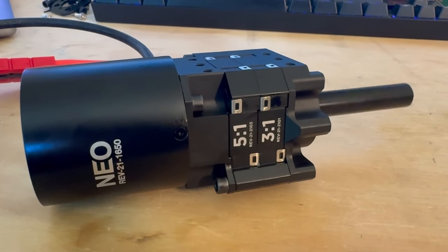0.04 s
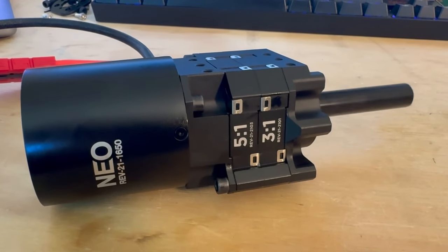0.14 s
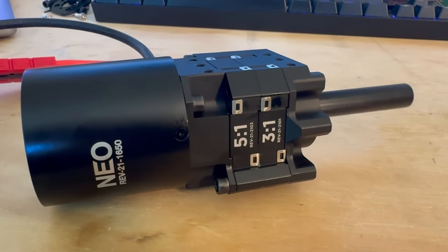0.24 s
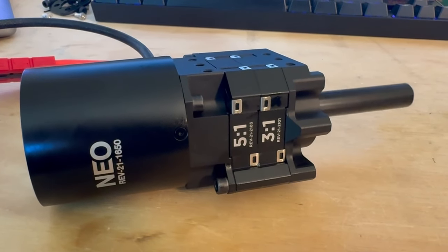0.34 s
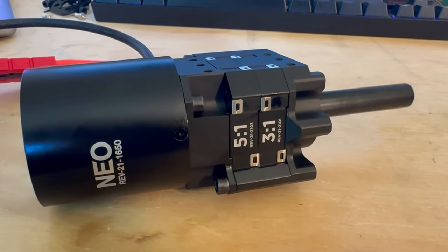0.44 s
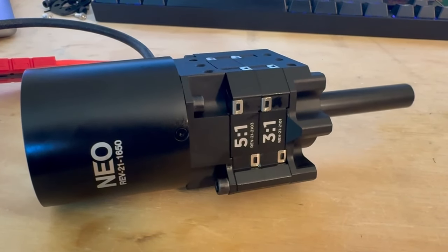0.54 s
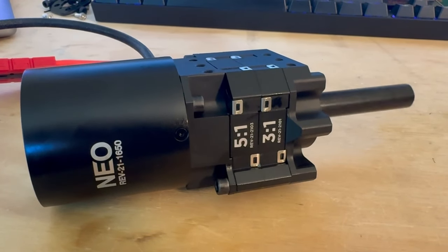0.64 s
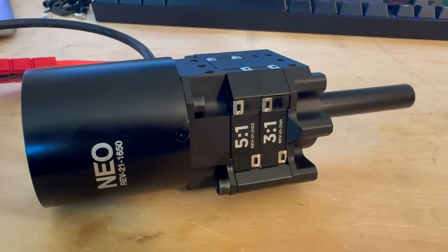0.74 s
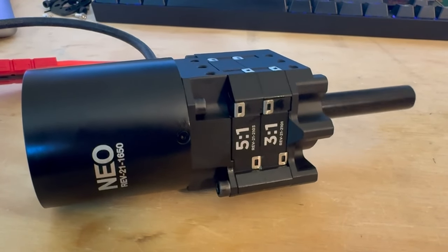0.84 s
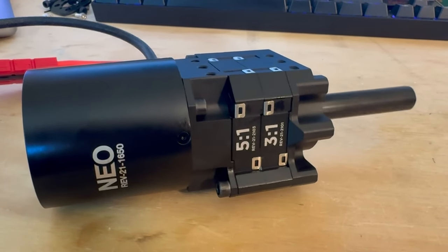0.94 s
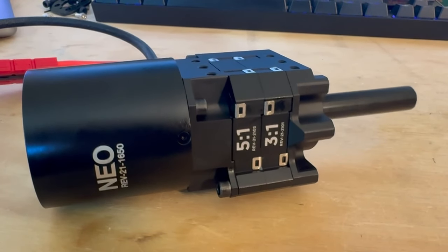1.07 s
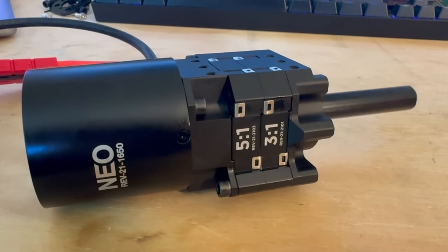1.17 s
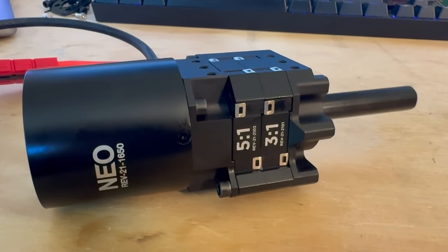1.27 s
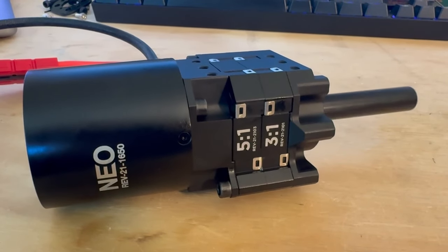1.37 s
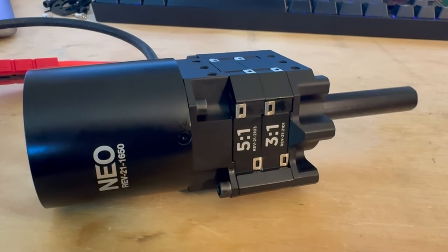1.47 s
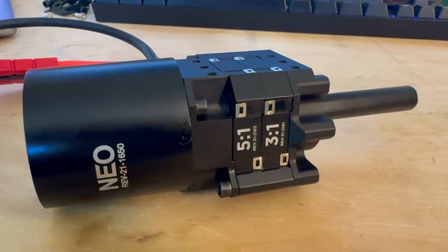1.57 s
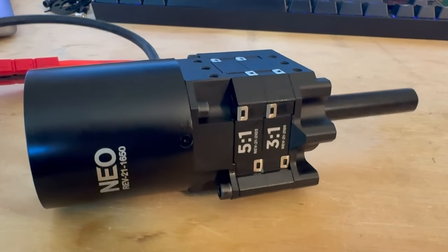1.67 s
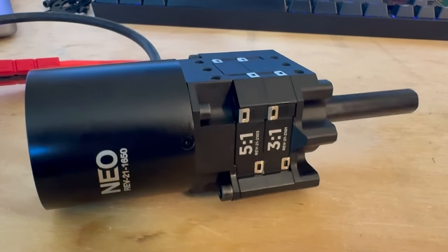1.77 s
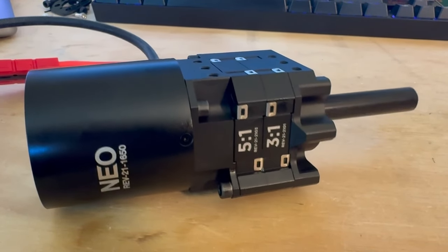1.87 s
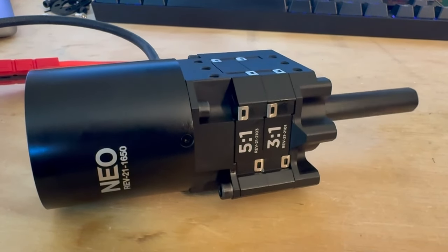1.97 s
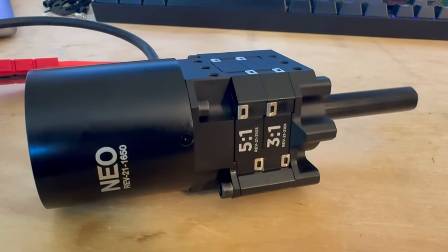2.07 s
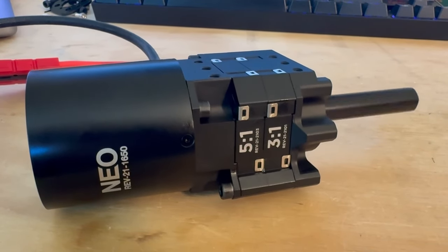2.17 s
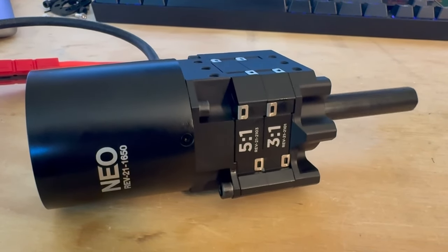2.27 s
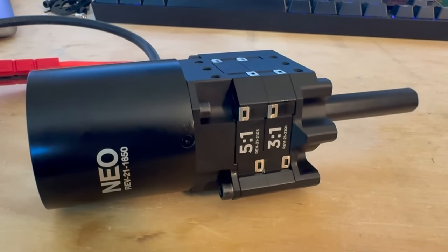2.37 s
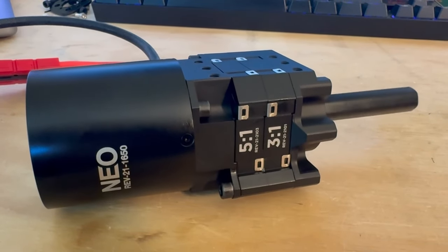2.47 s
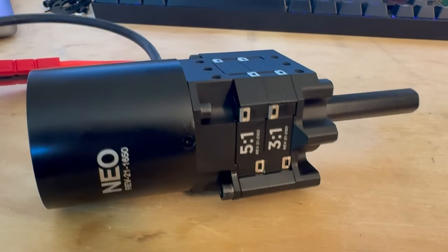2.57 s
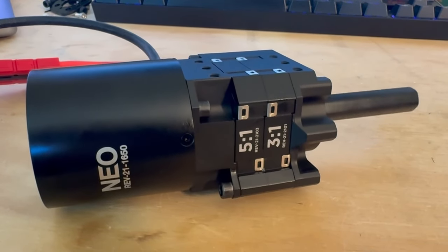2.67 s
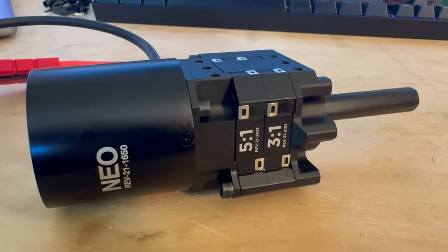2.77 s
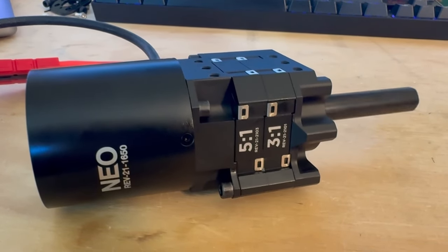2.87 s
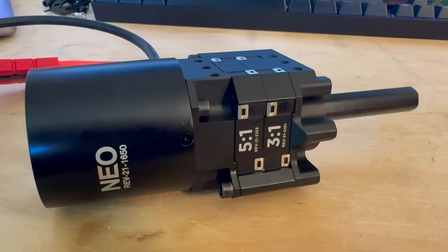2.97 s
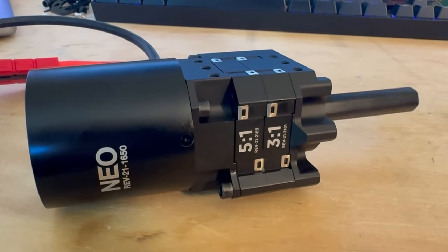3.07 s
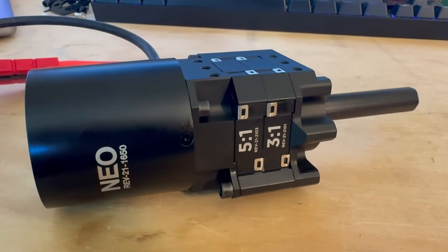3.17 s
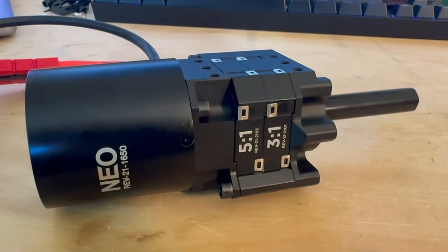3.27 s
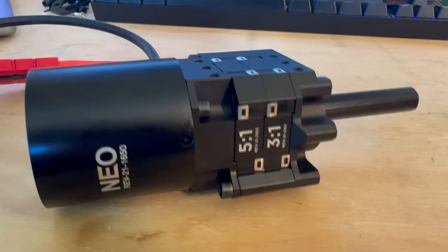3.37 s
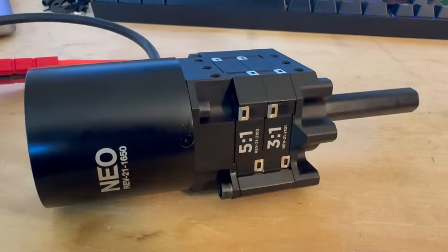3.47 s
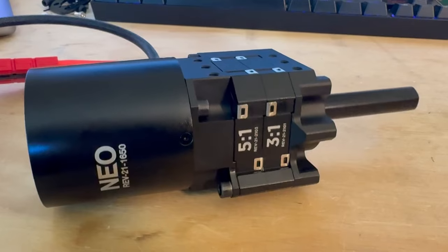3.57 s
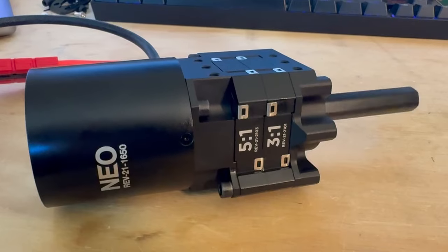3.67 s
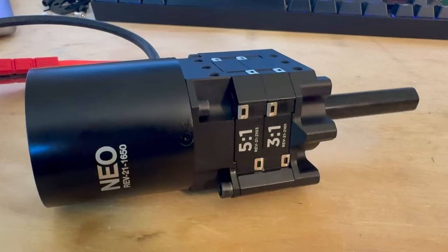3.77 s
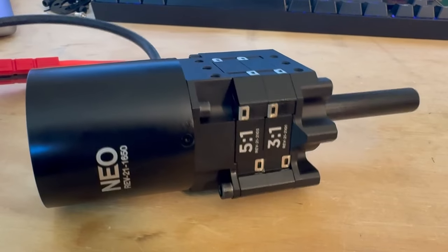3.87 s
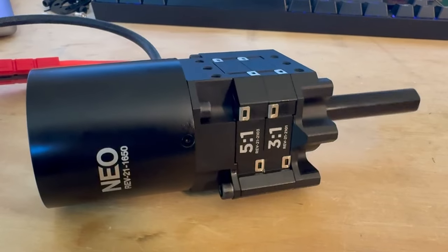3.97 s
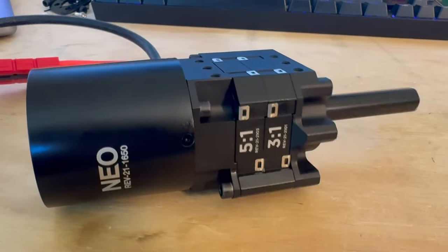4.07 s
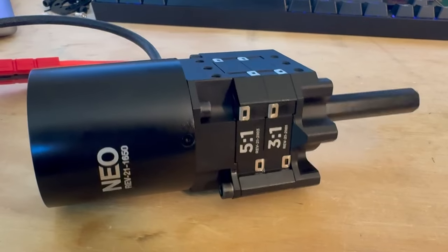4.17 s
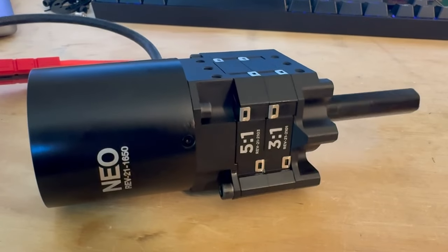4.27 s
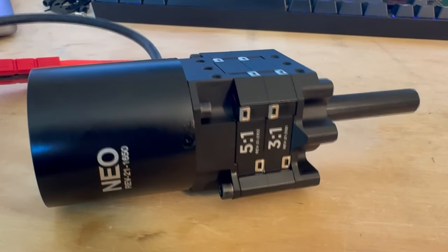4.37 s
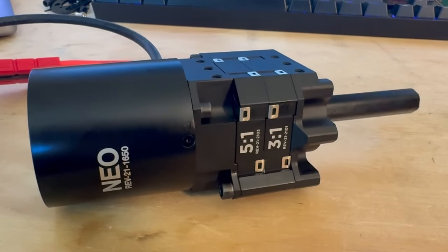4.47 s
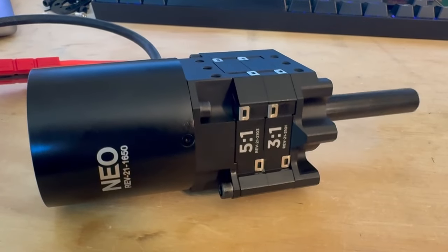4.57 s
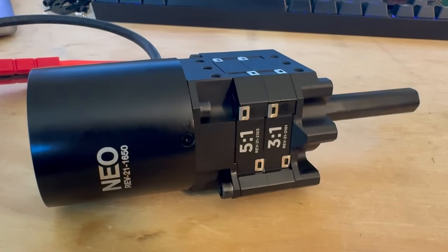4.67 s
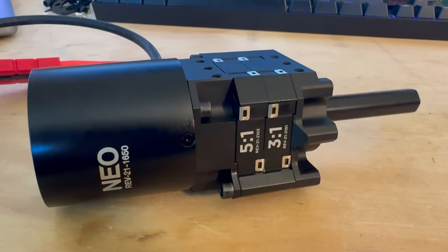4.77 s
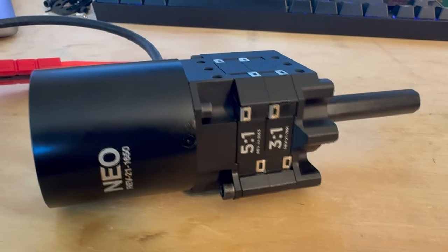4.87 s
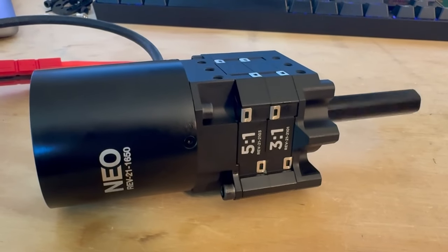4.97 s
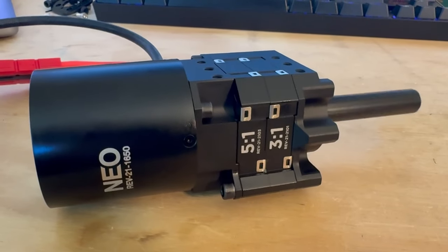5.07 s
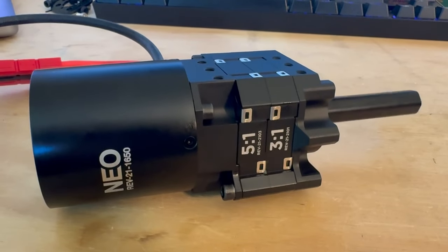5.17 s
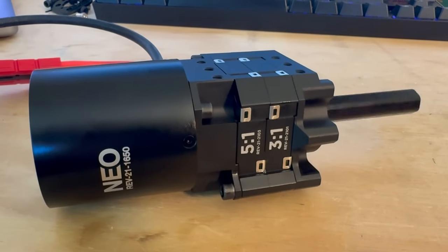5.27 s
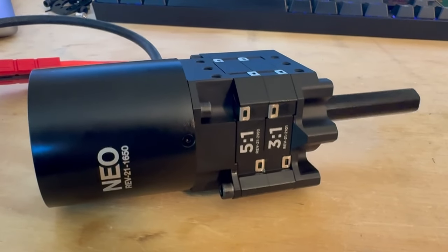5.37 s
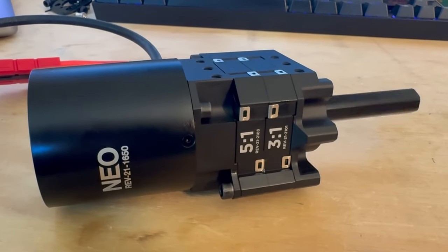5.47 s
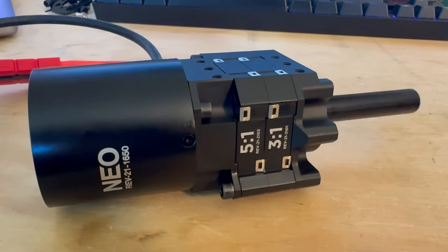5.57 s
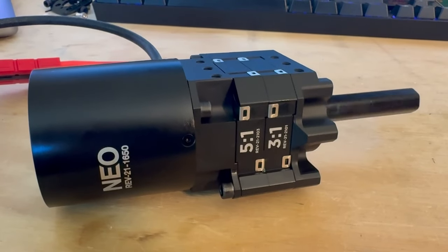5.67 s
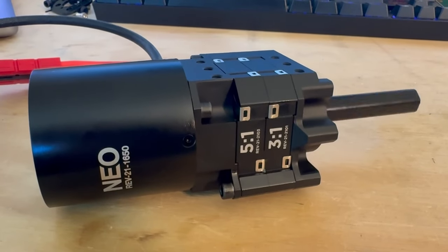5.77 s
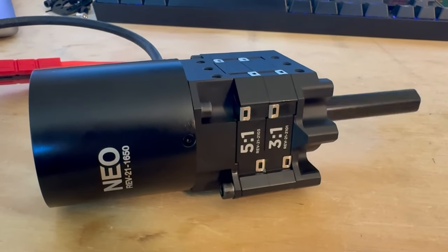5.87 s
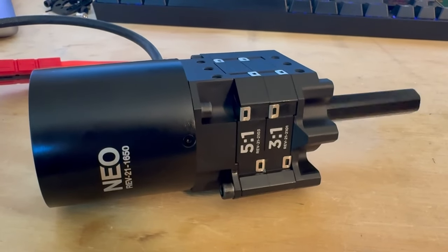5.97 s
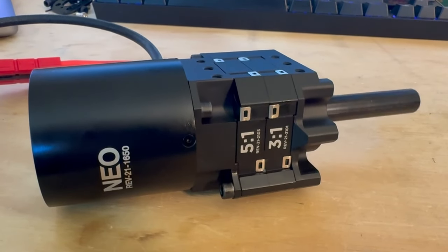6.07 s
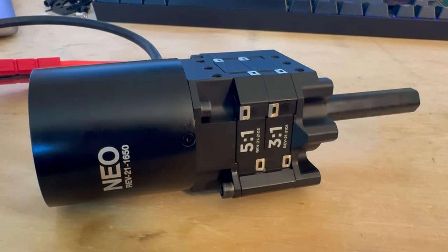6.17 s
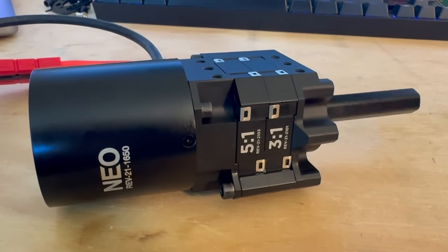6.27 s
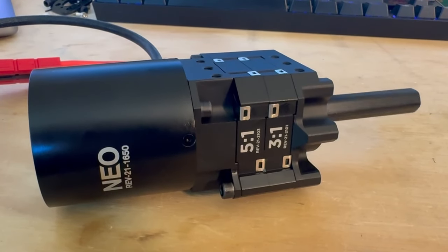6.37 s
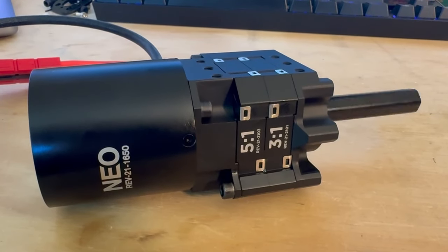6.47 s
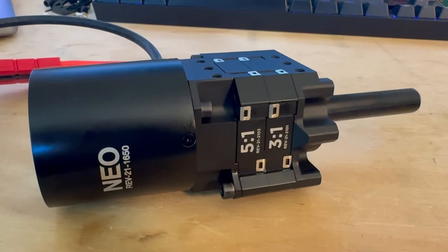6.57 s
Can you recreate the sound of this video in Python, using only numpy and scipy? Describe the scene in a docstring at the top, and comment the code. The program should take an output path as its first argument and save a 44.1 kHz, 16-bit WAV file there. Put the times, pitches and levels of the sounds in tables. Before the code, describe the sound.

Stereo close pickup of a running geared motor lying on a desk, with no other sounds. Steady high-speed whirring comes first: dense, sizzling metal chatter, a buzzing low hum and singing whines. Then everything winds down unevenly, pitch dropping in slopes and brief plateaus, with occasional sharp ticks. The rattle softens and loses its edge, leaving a low whine, a desk rumble and a growling pulse about twice a second.

```python
"""A bright rattle of loose gear teeth comes first, over the hum and whine of a small motor on a desk.
The motor turns a two-stage planetary gearbox and slows in steps, so the tones glide down and swell on
resonances of the desk and case. The rattle is noise shaped by tooth knocks, and gets quieter and duller.
The tones are sine waves locked to the rotor. Single hard snaps stand out of the rattle.
At low speed a tight spot throbs clearly, once in every turn of the output shaft."""
import sys
import numpy as np
from scipy import signal
from scipy.fft import rfft, irfft
from scipy.io import wavfile

SR = 44100
rng = np.random.default_rng(int(sys.argv[2]) if len(sys.argv) > 2 else 0)


def store_wav(level_fs):
    """Save 16-bit WAV to argv[1]."""
    pcm = np.round(np.clip(np.atleast_2d(level_fs), -1, 1) * 32767)
    wavfile.write(sys.argv[1], SR, pcm.T.astype(np.int16))


N = 291921
TIME = np.arange(N) / SR  # seconds
BINS = np.fft.rfftfreq(N, 1 / SR)  # Hz
MIDDLE_SPEED = 65  # rotor turns per second at which the source levels are given
BINDING_SPEED = 50  # rotor turns per second; above it the gears run more and more smoothly through binding
GEAR_RATIO = 15  # rotor turns per output turn, from a 5:1 and a 3:1 stage
RING_TEETH = 72  # teeth on each ring gear


# How fast the motor turns: start_s, speed_turns_per_s (straight lines in between)
ROTOR_SPEED = [(0, 110.8), (0.79, 110.6), (1, 103.7), (1.15, 100.7), (1.36, 97.8), (1.72, 87.6),
               (2.05, 84.3), (2.31, 79.8), (2.37, 77.6), (2.5, 76), (2.56, 73.6), (2.69, 71.9),
               (2.97, 71.9), (3.09, 69.8), (3.41, 67.4), (3.52, 63.1), (3.76, 63.1), (3.94, 58.9),
               (4.14, 57.4), (4.19, 53.5), (4.35, 49), (4.55, 46), (5.05, 42.9), (5.45, 36.8), (5.75, 34.9),
               (6.3, 31), (6.62, 30.9)]


def rotor_speed():
    """The rotor slows in steps; this one speed drives the tones and all the steady gear noise."""
    start_s, turns_per_s = np.transpose(ROTOR_SPEED)
    return np.interp(TIME, start_s, turns_per_s)


# How strongly the teeth sound at each pitch: pitch_hz, relative_level_db
TOOTH_RESPONSE = [(2400, -22), (3300, -14.5), (4500, -11), (5350, -9), (6800, -8.5), (7400, 1), (7650, -2),
                  (8600, -7.5), (9700, -14), (11100, -22), (12300, -19.5), (13100, -24), (14500, -14.5),
                  (15600, -26)]


def rattle(speed, top_db_per_octave=5, low_db_per_octave=-3.0):
    """Steel teeth clatter in their backlash; faster, harder contacts carry more top."""
    clatter = knocks(speed, per_turn=28, spread_db=3.0, throb_db=1.1, surge_db=0.4, ring_s=0.001, sliding=0.8)
    grazes = knocks(speed, per_turn=40, spread_db=3.3, throb_db=1.0, surge_db=1.4, ring_s=0.00084, sliding=0.49)
    fizz = knocks(speed, per_turn=40, spread_db=2.0, throb_db=0.45, surge_db=0.5, ring_s=0.0006, sliding=0.55)
    # the briefer a contact, the higher the range that it rules
    upper = 1 / (1 + (7300 / (BINS + 1)) ** 6)
    top = 1 / (1 + (10500 / (BINS + 1)) ** 10)
    low = 1 / (1 + (BINS / 4000) ** 6)
    treble = np.sqrt(1 - top) * rfft(grazes) + np.sqrt(top) * rfft(fizz)
    spectrum = np.sqrt(1 - upper) * rfft(clatter) + np.sqrt(upper) * treble
    drive = irfft(spectrum * steel_gain(), N)
    octaves = np.log2(speed / MIDDLE_SPEED)
    sound = microphones(*drive, TOOTH_RESPONSE)
    sound = lean(sound, amp(top_db_per_octave * octaves), top)
    sound = lean(sound, amp(low_db_per_octave * octaves), low)
    return level(speed, db=-28.5, db_per_octave=9.0) * grind(speed) * sound


# How the tooth load rises and falls: cycles_per_rotor_turn, relative_depth
# These are cycles of the carrier, planets, sun and rotor.
LOAD_CYCLES = [(0.2, 0.2), (0.4, 0.5), (0.8, 0.4), (1, 1.5), (1.4, 0.35), (2, 0.5)]


def knocks(speed, per_turn, spread_db, throb_db, surge_db, ring_s, sliding):
    """Tooth impacts of uneven size over sliding noise, bunched by the load cycles of rotor and planets."""
    angle = 2 * np.pi * np.cumsum(speed) / SR
    hardness = np.minimum(speed / MIDDLE_SPEED, 1) ** 0.5
    unevenness = hardness  # slow teeth meet with less varied force
    size = amp(spread_db * unevenness * np.minimum(rng.exponential(1, N), 4))
    hits = size * (rng.random(N) < per_turn * speed / SR)
    # each knock starts a burst whose power dies away in about ring_s
    power = signal.lfilter([1], [1, -np.exp(-1 / (ring_s * SR))], hits ** 2) / speed
    cycles = sum(depth * np.cos(order * angle + 2 * np.pi * rng.random()) for order, depth in LOAD_CYCLES)
    load = amp(throb_db * cycles + surge_db * drift(17.0))
    # sliding is the steady power beside an average knock power of 1
    return load * np.sqrt(power / power.mean() + sliding) * rng.standard_normal((2, N))


# Narrow resonances of the steel parts: pitch_hz, width_hz, lift_db
STEEL_MODES = [(2854, 25, 5.5), (3165, 67, 3), (3485, 86, 5.5), (4050, 240, 2), (4400, 27, 2),
               (5150, 64, 5), (5370, 126, 4.5), (6250, 170, 3.5), (6900, 130, 4), (7360, 160, 1.5),
               (8660, 280, 3)]


def steel_gain():
    """The strong resonances of the steel stand over a fine random ripple from the many weak ones."""
    grid_hz = np.arange(0, SR / 2, 30)
    ripple_db = 1.5 * np.interp(BINS, grid_hz, rng.standard_normal(len(grid_hz)))
    return amp(lift(STEEL_MODES, BINS) + ripple_db)


def grind(speed, lead_turns=0.1, grind_db=2.1, chug_db=0.95, carrier_turns=3):
    """The rattle chugs once in each turn of the first carrier, and hardest on entering the tight spot."""
    # lead_turns and carrier_turns are counted in, and per, turn of the output shaft
    carrier = np.cos(2 * np.pi * carrier_turns * (from_tight_spot(speed) + lead_turns))
    chug = carrier * np.minimum(BINDING_SPEED / speed, 1) ** 2
    return amp(grind_db * tight_spot(speed, early_turns=lead_turns) + chug_db * chug)


# Moments when a planet gear snaps across its whole backlash: start_s, relative_level_db
SNAPS = [(0.591, -12), (1.007, -13), (1.104, -11), (2.068, -12), (2.1395, -14), (2.266, -12), (2.3256, -14),
         (2.6787, -11.5), (3.061, -18), (3.076, -20), (3.426, -14.5), (3.822, -28), (4.162, -17.5),
         (5.186, -22), (5.654, -21)]


def snaps(ring_s=0.0018):
    """Single hard contacts are short bursts of noise that stand out of the rattle."""
    blows = np.zeros(N)
    for start_s, level_db in SNAPS:
        blows[round(start_s * SR)] = amp(level_db)
    envelope = signal.lfilter([1], [1, -np.exp(-1 / (ring_s * SR))], blows)
    bursts = envelope * rng.standard_normal((2, N))
    return amp(-3.5) * np.std(envelope) * microphones(*bursts, TOOTH_RESPONSE)


# Resonances of the motor on the desk top, which lift tones as they sweep past: pitch_hz, width_hz, lift_db
DESK_MODES = [(47, 42, 34), (89, 33, 26.5), (121, 33, 30.5), (135, 9, 9), (160, 24, 23), (213, 60, 32.5),
              (249, 24, 20), (332, 33, 18), (443, 45, 15), (497, 60, 7.5)]
# Multiples of the rotor speed in the hum: cycles_per_rotor_turn
HUM_ORDERS = [1, 2, 3, 4]
# One row for each hum tone, off resonance: level_db, growth_db_per_octave (of speed)
HUM_LEVELS = [(-80.8, 23), (-79.4, 22.5), (-80.6, 21), (-77.8, 17)]


def hum(speed):
    """The unbalanced rotor shakes the desk at its first four harmonics; the higher ones waver more."""
    return sum(swell(DESK_MODES, order, speed, *row) * tone(order, speed, rough=0.013 * order ** 2, flutter_hz=12)
               for order, row in zip(HUM_ORDERS, HUM_LEVELS))


# Resonances of the gear case, which do the same higher up: pitch_hz, width_hz, lift_db
CASE_MODES = [(880, 60, 7), (935, 76, 17), (1014, 100, 16.5), (1082, 36, 11), (1263, 130, 12),
              (2300, 150, 20), (2425, 80, 18), (2640, 110, 9)]
# 13 is one strong whine; 14 magnet poles on 3 phases give 42: cycles_per_rotor_turn
WHINE_ORDERS = [13, 42]
# One row for each whine, off resonance: level_db, growth_db_per_octave (of speed)
WHINE_LEVELS = [(-60.4, 3), (-65.5, 8.5)]


def whine(speed):
    """Two whines, at 13 and 42 cycles per rotor turn, sing in firm glides above the hum."""
    return sum(swell(CASE_MODES, order, speed, *row) * tone(order, speed, rough=0.2, flutter_hz=30)
               for order, row in zip(WHINE_ORDERS, WHINE_LEVELS))


def low_whine(speed):
    """At low speed the mesh of the 5:1 stage settles onto a resonance of the desk."""
    order = RING_TEETH / 5
    gain = swell(DESK_MODES + CASE_MODES, order, speed, db=-80, db_per_octave=-17.5)
    return gain * tone(order, speed, rough=0.3, flutter_hz=20)


def drone(speed, throb_db=13.5, octave_throb_db=6):
    """The slow output mesh and its octave throb each time the tight spot comes round."""
    order = RING_TEETH / GEAR_RATIO
    tight = tight_spot(speed)
    mesh = swell(DESK_MODES, order, speed, db=-83, db_per_octave=3)
    mesh = mesh * tone(order, speed, rough=0.18, flutter_hz=30)
    octave = swell(DESK_MODES, 2 * order, speed, db=-70.5, db_per_octave=-2)
    octave = octave * tone(2 * order, speed, rough=0.68, flutter_hz=22.5)
    return amp(throb_db * tight) * mesh + amp(octave_throb_db * tight) * octave


# Pole passing, then sidebands of the input mesh and its octave: cycles_per_rotor_turn
SIDEBAND_ORDERS = [14, 15, 15.4, 16.4, 29.8]
# One row for each of them, off resonance: level_db, growth_db_per_octave (of speed)
SIDEBAND_LEVELS = [(-66.5, 2), (-71.5, 13), (-69.5, 13), (-69.5, 12), (-79, -4)]


def sidebands(speed):
    """Weak tones beside the mesh stand out most where the case resonates."""
    return sum(swell(CASE_MODES, order, speed, *row) * tone(order, speed, rough=0.22, flutter_hz=10)
               for order, row in zip(SIDEBAND_ORDERS, SIDEBAND_LEVELS))


# How strongly the gear case sounds at each pitch: pitch_hz, relative_level_db
CASE_RESPONSE = [(620, -16), (700, -9.5), (800, -11), (950, -1.5), (1100, -2.5), (1280, -5.5),
                 (1450, -10.5), (1900, -10), (2300, -16.5)]


def case_ring(speed, bell_hz=971, bell_width_hz=62, mesh_lift_db=12, reach_hz=190):
    """Knocks ring the case; one mode near 970 Hz swells as the input mesh or its octave comes near."""
    blows = knocks(speed, per_turn=10.0, spread_db=-0.1, throb_db=-0.5, surge_db=0.97, ring_s=0.001, sliding=1)
    mode = irfft(rfft(blows) / (1 + 2j * (BINS - bell_hz) / bell_width_hz), N)
    mesh_hz = speed * RING_TEETH / 5
    nearness = sum(1 / (1 + ((k * mesh_hz - bell_hz) / reach_hz) ** 2) for k in (1, 2))
    bell_gain = level(speed, db=-60.0, db_per_octave=2.0) * amp(mesh_lift_db * nearness)
    body = level(speed, db=-39.5, db_per_octave=5.0) * microphones(*blows, CASE_RESPONSE)
    return body + bell_gain * microphones(*mode, CASE_RESPONSE)


# How strongly the desk top sounds at each pitch: pitch_hz, relative_level_db
DESK_RESPONSE = [(25, -17), (60, -13), (100, -4.5), (150, -0.5), (185, -5.5), (235, 3.5), (295, -8),
                 (350, 0), (400, -6.5), (460, -5.5), (540, -8), (620, -29)]


def rumble(speed, bass_db_per_octave=4.5, thud_db=5.5):
    """Jolts pass through the mount into the desk top, with more bass at speed and a thud at the tight spot."""
    blows = knocks(speed, per_turn=3.9, spread_db=0.5, throb_db=0.5, surge_db=0.8, ring_s=0.0057, sliding=0.97)
    bass = 1 / (1 + (BINS / 130) ** 6)
    sound = lean(microphones(*blows, DESK_RESPONSE), level(speed, 0, bass_db_per_octave), bass)
    return level(speed, db=-40.8, db_per_octave=3.8) * amp(thud_db * tight_spot(speed)) * sound


def tight_spot(speed, early_turns=0, width_turns=0.1):
    """How hard the gears bind, 0-1: one short bump per output turn, weakened by momentum at speed."""
    bump = np.exp(-((from_tight_spot(speed) + early_turns) / width_turns) ** 2)
    return bump * np.minimum(BINDING_SPEED / speed, 1) ** 2


def from_tight_spot(speed, binding_s=5.5):
    """Turns of the output shaft from the nearest tight spot, -1/2 to 1/2; binding_s is one such moment."""
    turns = np.cumsum(speed) / SR / GEAR_RATIO
    return (turns - np.interp(binding_s, TIME, turns) + 0.5) % 1 - 0.5


# How alike the two microphones hear each pitch: pitch_hz, likeness (0-1)
LIKENESS = [(30, .5), (80, .76), (430, .94), (650, .2), (1000, .85), (1750, .2), (3100, .3), (4700, .58),
            (5400, .55), (5900, .1), (6300, .7), (7500, .86), (11000, .92), (12800, .35), (15000, .95)]
# How far the left microphone leads: pitch_hz, lead_radians
LEAD = [(500, 0), (750, 1), (950, -0.5), (1200, 1), (1550, 3), (3300, 2.7), (4400, 0.3), (6200, 1),
        (6850, .8), (7200, 2), (7900, 3), (11500, 3), (13400, .7), (15000, 0)]
# How much louder the left microphone is: pitch_hz, left_minus_right_db
BALANCE = [(560, -0.3), (850, 10), (1150, 2), (2500, 5), (4250, 9), (4750, 4.5), (5100, 6), (6000, 11),
           (6600, 0), (7350, 4.5), (7900, 2.5), (9500, -.5)]


def microphones(near, far, body):
    """Two unrelated vibrations, coloured by a body, reach the microphones partly alike; rms becomes 1."""
    left, other = rfft(near), rfft(far)
    same = np.clip(read(LIKENESS, BINS), 0, 1)
    tilt = amp(read(BALANCE, BINS) / 2)
    right = same * left + np.sqrt(1 - same ** 2) * other
    right = right * np.exp(-1j * read(LEAD, BINS))
    pair = np.array([left * tilt, right / tilt])
    return unit(irfft(pair * response(body, BINS) / np.hypot(tilt, 1 / tilt), N))


def tone(order, speed, rough, flutter_hz):
    """A stereo sine locked to the rotor; uneven tooth contact makes its level and phase flutter."""
    hz = order * speed
    flutter = unit(1 + rough * (drift(flutter_hz) + 1j * drift(flutter_hz)))
    line = np.exp(2j * np.pi * np.cumsum(hz) / SR) * flutter
    tilt = amp(read(BALANCE, hz) / 2)
    right = line * np.exp(-1j * read(LEAD, hz))
    return 2 * np.array([line * tilt, right / tilt]).real / np.hypot(tilt, 1 / tilt)


def swell(modes, order, speed, db, db_per_octave):
    """Gain of a tone: it follows the speed and swells on each resonance that it crosses."""
    return level(speed, db, db_per_octave) * amp(lift(modes, order * speed))


def level(speed, db, db_per_octave):
    """Gain that is db at the middle speed and changes by db_per_octave for each doubling of speed."""
    return amp(db + db_per_octave * np.log2(speed / MIDDLE_SPEED))


def lift(modes, hz):
    """Decibels added by a table of resonances."""
    return sum(db / (1 + (2 * (hz - centre) / width) ** 2) for centre, width, db in modes)


def lean(sound, gain, weight):
    """Scales the part of the spectrum picked by weight with a moving gain."""
    return sound + (gain - 1) * irfft(rfft(sound) * weight, N)


def response(points, hz, skirt_db=45):
    """Gain of a body; outside its table it falls by a further skirt_db an octave."""
    inside = np.clip(hz, points[0][0], points[-1][0])
    octaves_outside = abs(np.log2((hz + 1) / (inside + 1)))
    return amp(read(points, hz) - skirt_db * octaves_outside)


def read(points, hz):
    """Looks up a table of pitches on a logarithmic pitch axis."""
    pitch_hz, value = np.transpose(points)
    return np.interp(np.log(hz + 1), np.log(np.sort(pitch_hz) + 1), value)


def drift(hz):
    """Smooth random wandering of rms 1, mostly slower than hz."""
    return unit(irfft(rfft(rng.standard_normal(N)) / (1 + (BINS / hz) ** 4), N))


def unit(x):
    """Scales to rms 1."""
    return x / np.sqrt(np.mean(abs(x) ** 2) + 1e-20)


def amp(db):
    """Decibels to gain."""
    return 10 ** (np.asarray(db) / 20)


def scene():
    """Adds the gear noise, the motor tones and the rumble of the desk."""
    speed = rotor_speed()
    gears = rattle(speed) + snaps() + case_ring(speed)
    tones = hum(speed) + whine(speed) + low_whine(speed) + drone(speed) + sidebands(speed)
    return gears + tones + rumble(speed)


def record(dry, cutoff_hz=15750):
    """A steep low-pass filter takes away the highest treble."""
    taps = signal.firwin(1023, cutoff_hz, window=("kaiser", 9), fs=SR)
    return signal.oaconvolve(dry, taps[None], "same", axes=1)


dry = scene()
out = record(dry)
store_wav(out)
```